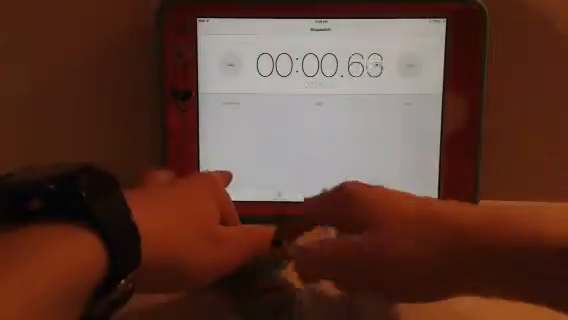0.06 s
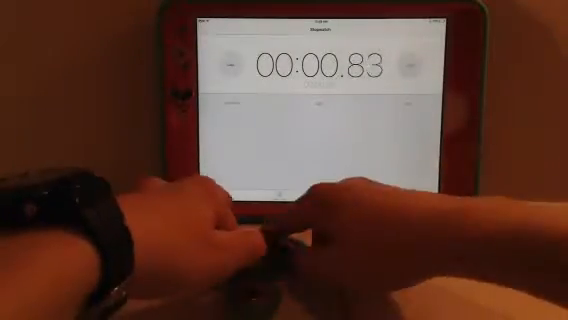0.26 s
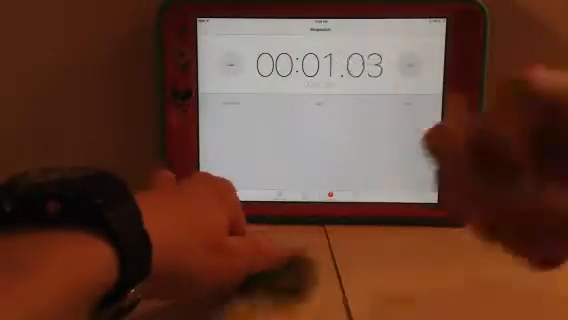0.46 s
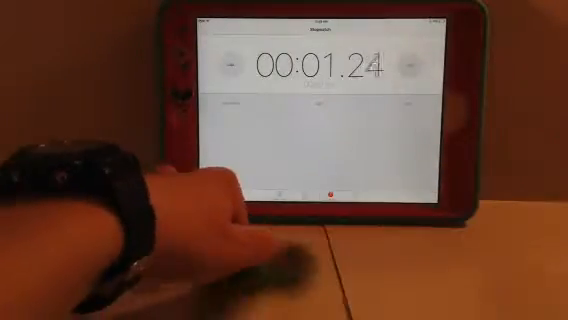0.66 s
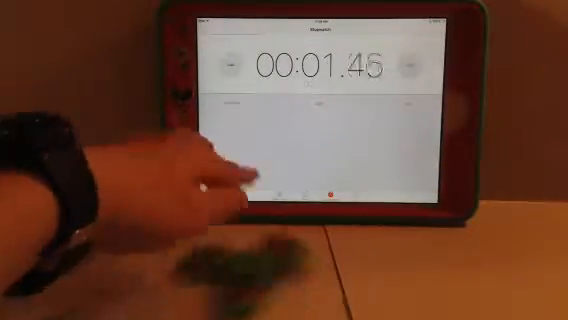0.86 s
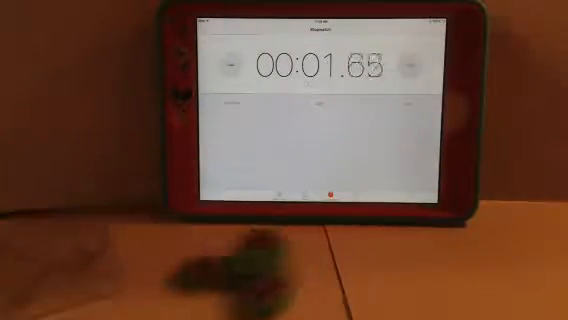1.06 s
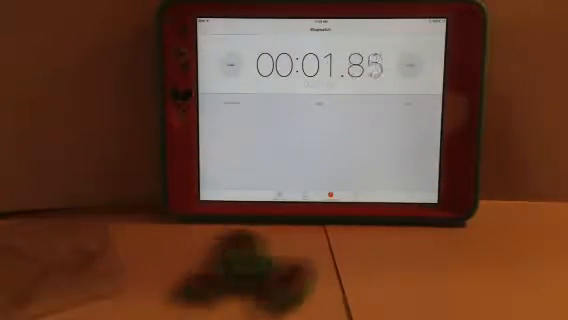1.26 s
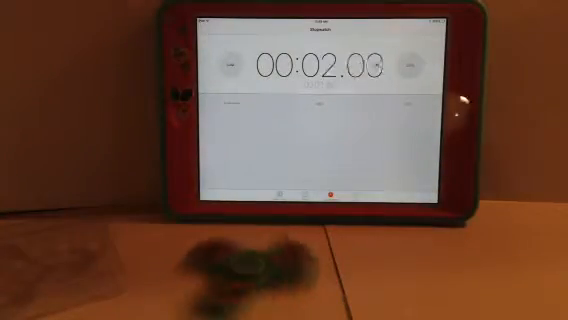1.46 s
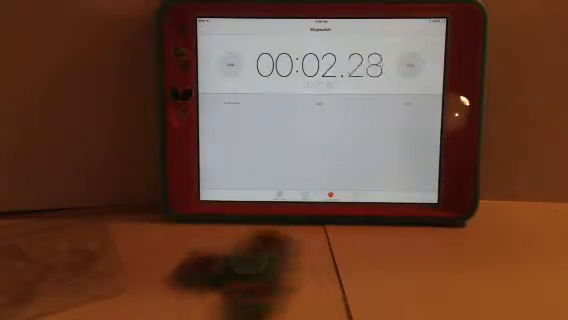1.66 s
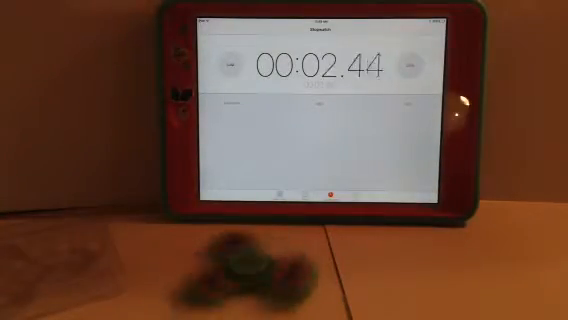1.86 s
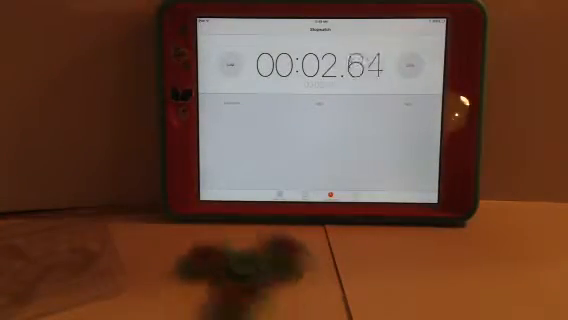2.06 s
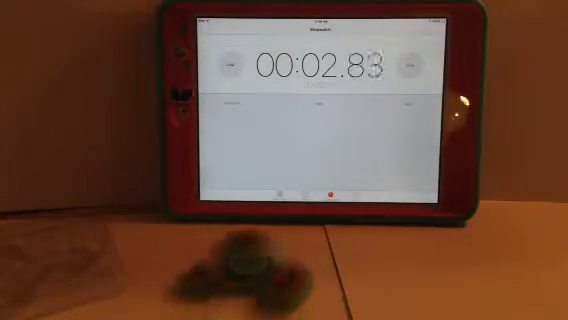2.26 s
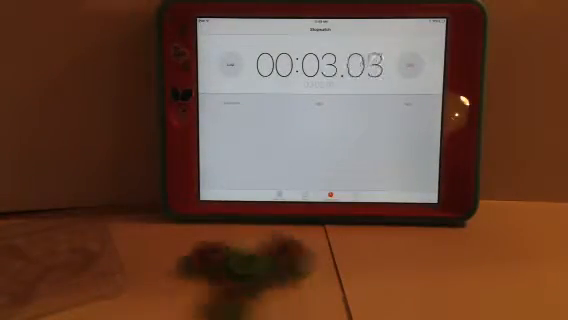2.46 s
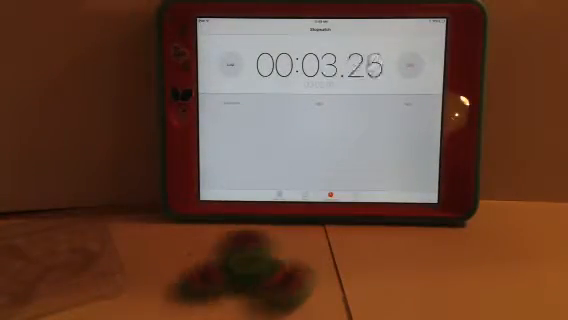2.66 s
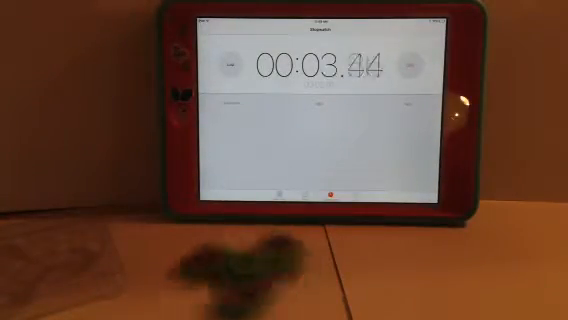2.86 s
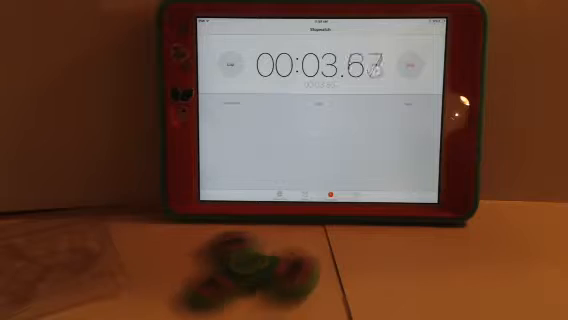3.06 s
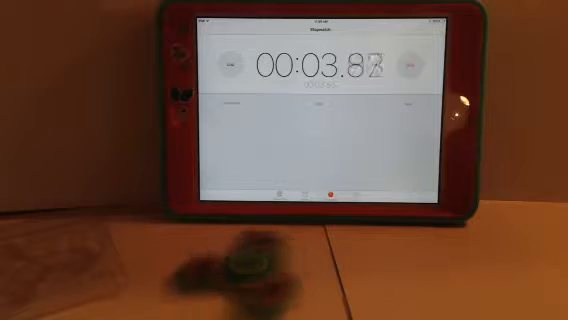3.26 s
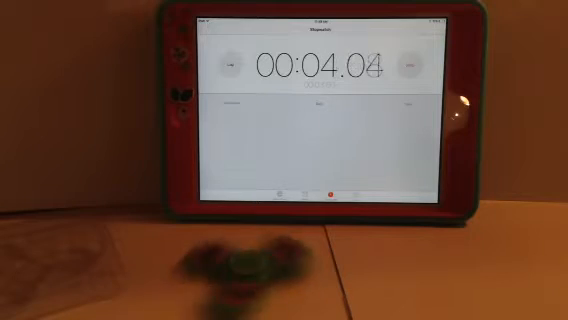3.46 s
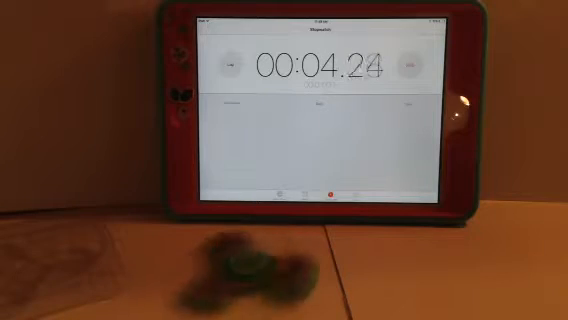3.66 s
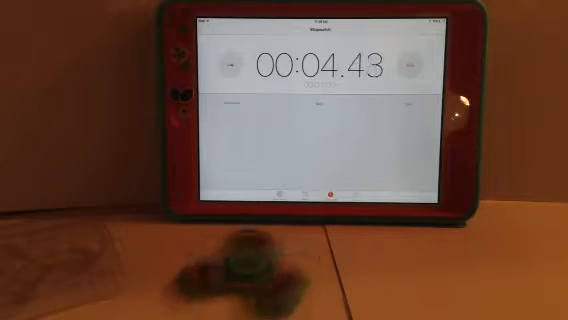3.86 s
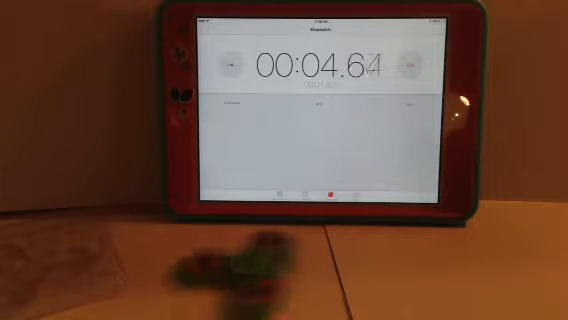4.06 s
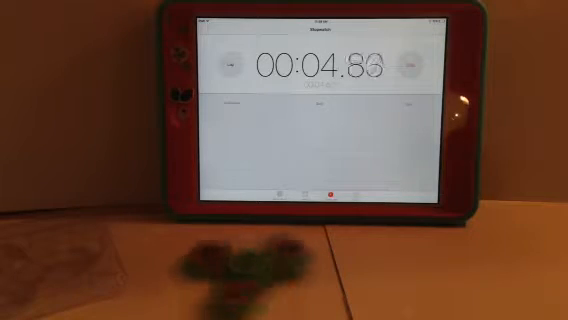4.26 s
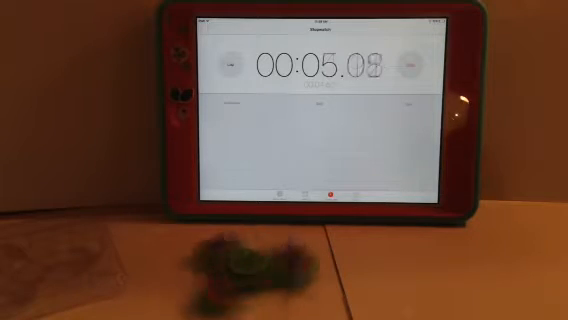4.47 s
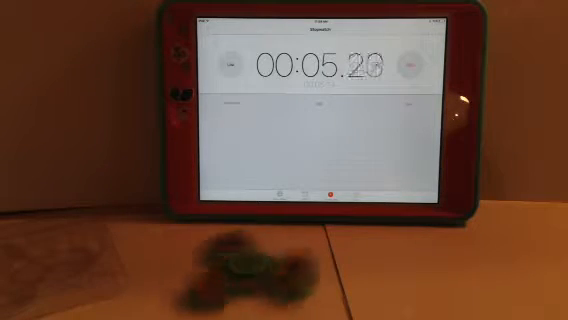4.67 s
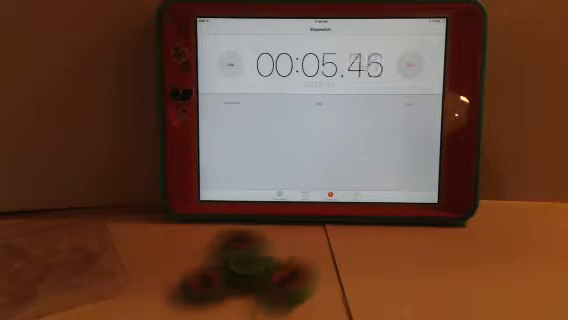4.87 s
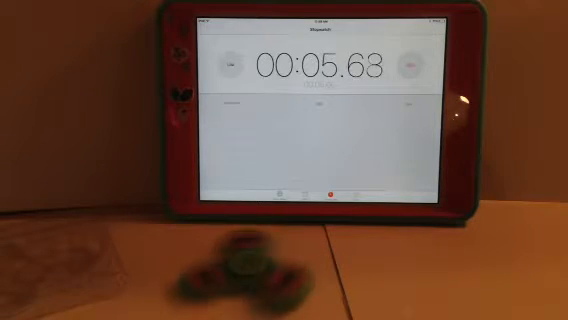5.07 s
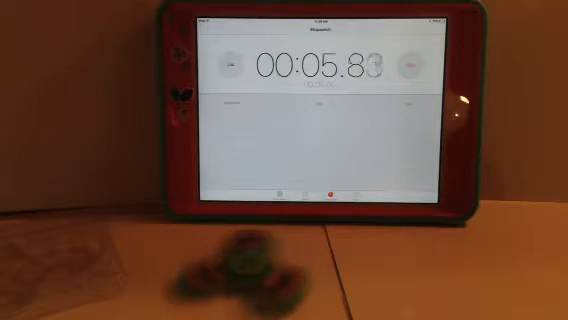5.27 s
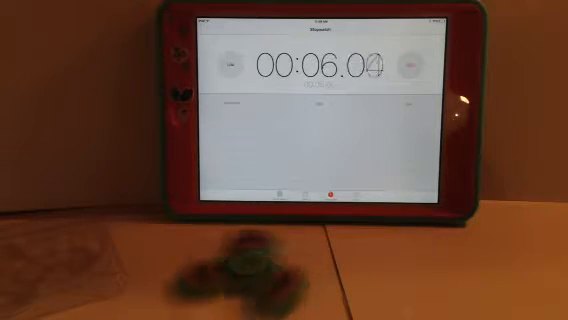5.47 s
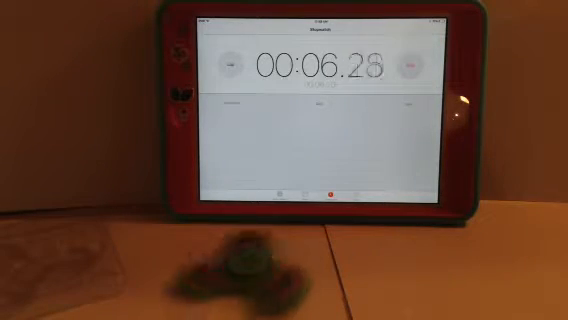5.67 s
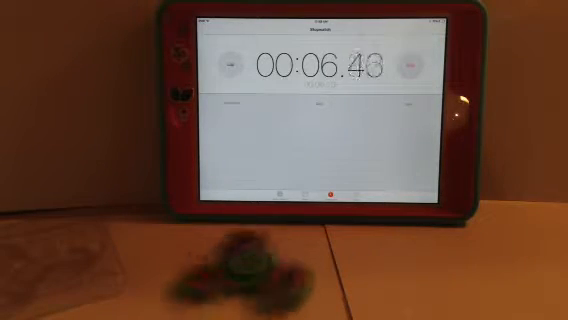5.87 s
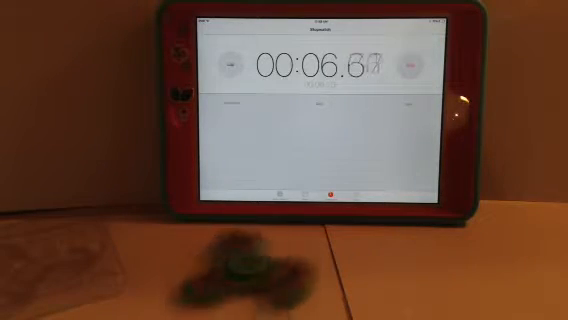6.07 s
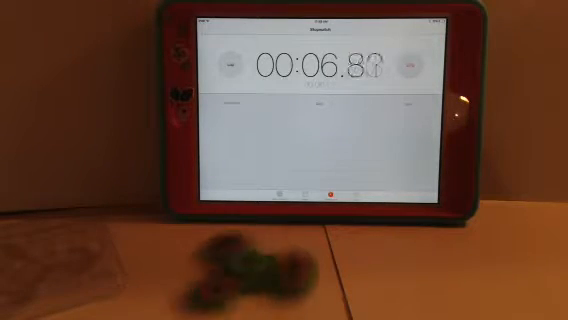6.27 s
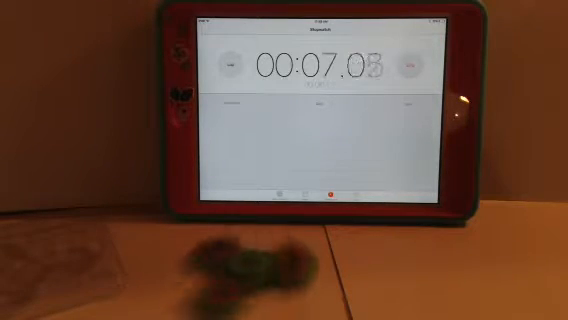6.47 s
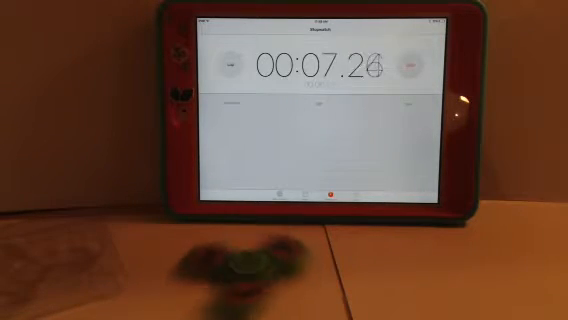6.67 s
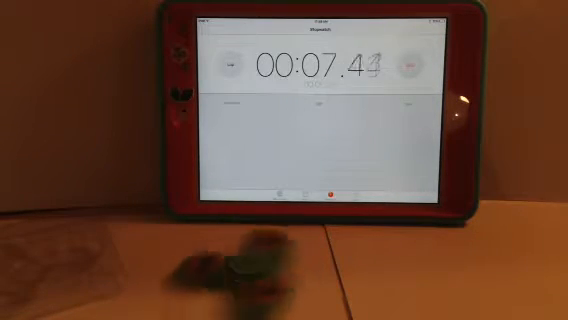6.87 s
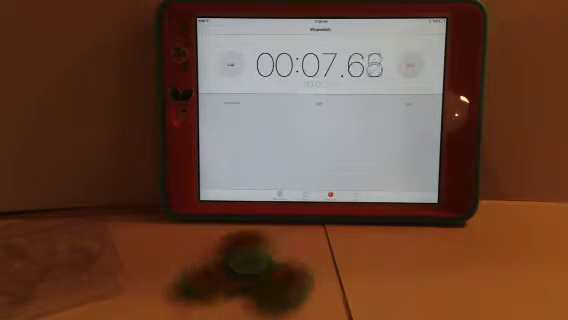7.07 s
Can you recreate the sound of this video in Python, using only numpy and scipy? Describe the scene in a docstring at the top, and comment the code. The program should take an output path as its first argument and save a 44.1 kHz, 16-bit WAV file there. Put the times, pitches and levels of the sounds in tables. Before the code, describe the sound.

Close up, a small spinning toy lands with a hard clack, knocks and wobbles on the table, then settles into a throbbing, gently sinking metallic whir.

```python
"""A three-armed fidget spinner is set down on a tabletop and flicked, close to a phone in a small room.
First a light tap and a thin ring; then the toy lands with a clack, modelled as noise bursts and a deep thud.
A finger scrapes off an arm and the bearing starts to whirr: rolling noise excites the modes of the body.
While a finger presses on the hub the table's ring is damped; then bouts of wobble drum on table and bearing.
Last comes a dry whirr that throbs three times a turn and slowly sinks, with sharp clicks of loose steel balls."""
import sys
import numpy as np
from scipy import signal
from scipy.fft import rfft, irfft
from scipy.io import wavfile
from scipy.ndimage import uniform_filter1d, map_coordinates

SR = 44100
rng = np.random.default_rng(int(sys.argv[2]) if len(sys.argv) > 2 else 0)


def pcm_store(signal):
    """Save signal as 16-bit PCM."""
    levels = np.round(np.clip(np.atleast_2d(signal), -1, 1) * 32767)
    wavfile.write(sys.argv[1], SR, levels.astype(np.int16).T)


N = 314433
TIME = np.arange(N) / SR

# All source levels are relative: filters, mixing gains and the room act on them later.
# slowing spin: (time [s], speed [turns/s])
SPIN = [(0, 11.9), (1, 11.45), (2.87, 10.76), (4.8, 10.285), (7.13, 9.725)]
# bouts of wobble: (start [s], knocks [count], knock rate [1/s], bearing rattle [dB], table drumming [dB],
# change of the body's rattle at the last knock [dB])
WOBBLES = [(0.86, 33, 115, -46.5, -48, 6), (1.221, 15, 45, -47, -56, -5), (1.551, 7, 55, -51, -56, 12.5),
           (1.787, 16, 55.6, -48.5, -52, 7), (2.122, 11, 40.6, -48, -65, 3),
           (2.391, 7, 44.3, -46.5, -61, 2)]
# resonant modes of the tabletop: (frequency [Hz], width [Hz], level [dB])
TABLE_MODES = [(183.4, 27, 2), (225.2, 16, 1.5), (293, 47, -6), (389, 30, 4), (457, 140, -6), (547, 39, -1),
               (613, 26, -2), (665, 49, -2.5), (865, 126, -9.5), (1005, 33, -1), (1145, 81, -10.5),
               (1343, 97, -8.5), (1466, 160, -12), (1930, 460, -17)]
# resonant modes of the spinner's body: (frequency [Hz], width [Hz], level [dB])
BODY_MODES = [(399, 55, -6), (1020, 35, -6.5), (1269, 214, -9), (1571, 200, -4), (1807, 106, 0),
              (2090, 610, -7.5), (2475, 64, 2.5), (2714, 84, 2), (2977, 70, 5.5), (3227, 180, -3.5),
              (3654, 163, -4), (4000, 160, -10), (4534, 99, -8)]
# resonant modes of the steel races: (frequency [Hz], width [Hz], level [dB])
STEEL_MODES = [(7150, 210, 4.5), (8140, 160, 15), (8360, 380, 7.5), (8840, 190, 18), (11200, 610, -8)]
# spectrum of the rolling hiss: (frequency [Hz], density [dB per Hz])
HISS_SPECTRUM = [(300, -17.5), (2500, -5.5), (4400, -2.5), (5300, -2), (6000, 3.5), (6900, 0), (7750, -3),
                 (8300, 6), (9200, 5), (10500, 1.5), (12000, -2.5), (13500, -10.5), (15000, -5.5)]
# spectrum of rattle, chatter and scrape: (frequency [Hz], density [dB per Hz])
CLACK_SPECTRUM = [(200, -9), (1500, 4.5), (3500, -9.5), (5000, 2), (7500, 3), (9500, 7.5), (11000, 5.5),
                  (12500, -5), (13800, -3), (15200, -2)]
# spectrum of the sharp clicks: (frequency [Hz], density [dB per Hz])
CRACK_SPECTRUM = [(200, -17), (800, -15), (1500, -10.5), (3500, -14), (5000, -3), (7500, -9.5), (9500, 0.5),
                  (11000, 7.5), (12500, 6), (13800, -0.5), (15200, -1)]
# spectrum of the bearing's throb: (frequency [Hz], density [dB per Hz])
THROB_SPECTRUM = [(200, 1.5), (700, -7.5), (1400, -3), (2000, -7), (2800, -3), (4500, -11), (9000, -0.5)]
# spectrum of the wobble's force on the table: (frequency [Hz], density [dB per Hz])
DRUMMING_SPECTRUM = [(140, -10), (225, -1.5), (400, -1.5), (600, 1.5), (750, -1), (1050, 3.5), (1450, 11),
                     (2500, -1), (8000, 4)]
# spectrum of a knock's force on the table: (frequency [Hz], density [dB per Hz])
KNOCK_SPECTRUM = [(110, -18.5), (180, 1.5), (240, 0), (420, 3.5), (620, 3), (1000, 6), (1400, 1.5),
                  (1750, 5), (2500, -7), (6000, -11.5)]
# spectrum of the landing: (frequency [Hz], density [dB per Hz])
SLAP_SPECTRUM = [(150, -0.5), (1000, -12), (2000, -10), (3000, -10), (4100, -23), (5100, -8), (6400, 4),
                 (7700, -3), (9500, 9), (11000, 3), (12500, 0), (15000, 1)]
# spectrum of the quiet room: (frequency [Hz], density [dB per Hz])
ROOM_TONE_SPECTRUM = [(25, 2), (60, -8), (98, -8), (122, 8.5), (160, 1.5), (270, 4.5), (420, 4.5),
                      (700, 0.5), (1500, -5), (5000, -7), (9000, -1), (15000, -2.5)]
# spectrum of the dry plastic tick: (frequency [Hz], density [dB per Hz])
TICK_SPECTRUM = [(1200, -12), (2500, 0), (5500, -1), (8500, -12)]
# rattles of plastic and loose steel balls: (start [s], contacts [count], gap [s], level [dB],
# change per contact [dB], share of the first contact that rings in the steel [0-1])
RATTLES = [(0.235, 2, 0.013, -45.5, -6, 0.35), (0.271, 2, 0.0083, -38, -5, 0.45),
           (0.302, 4, 0.008, -32, -4.5, 0.06), (.341, 1, .01, -52, 0, 0.8),
           (0.3735, 2, 0.013, -42.5, -2.5, 0.17), (0.468, 2, 0.018, -32, -2, 0.06),
           (1.2735, 2, 0.0032, -24, -6, 0.06), (1.29, 2, 0.0027, -26.5, -1, 0.04),
           (1.701, 2, 0.032, -32.5, -2.5, 0.2), (1.752, 1, .01, -35, 0, 0.4),
           (2.131, 3, 0.006, -38, -4.5, 0.22), (2.166, 3, 0.018, -43, -1, .9),
           (2.305, 2, 0.033, -45, -9, 0.4), (3.298, 5, 0.025, -45.5, 0, 0.67),
           (3.572, 2, 0.021, -46.5, 2.5, 0.8), (5.194, 2, 0.045, -48.5, 3.5, 0.6),
           (5.256, 3, 0.026, -42.5, -0.5, 0.75), (5.374, 2, 0.013, -45, -7, 0.1),
           (5.825, 2, 0.03, -46, 0.5, 0.64), (6.25, 1, .01, -49, 0, 0.8), (6.426, 2, 0.024, -49.5, -1, 0.3),
           (6.683, 2, 0.0014, -31.5, 1.5, 0.14), (6.6883, 2, 0.0089, -42, -1, 0.1),
           (6.712, 2, 0.0031, -38, 2, 0.25), (6.723, 1, .01, -35.5, 0, 0.8),
           (6.7457, 2, 0.027, -37, -8, 0.7)]
# soft contacts chatter longer than hard ones: (level [dB], decay [ms])
CONTACT_DECAY = [(-45, 8.0), (-35, 5), (-27, 2.6), (-18, 1.8)]
# knocks of the rocking hub on the table: (time [s], level [dB], contact length [ms])
THUMPS = [(.05, -60.5, 6.6), (0.281, -48.5, 6), (0.2869, -33, 10.7), (0.307, -38.5, 14), (0.33, -47, 13.4),
          (.455, -51, 14.5), (.471, -41, 17.7), (.493, -46, 6.8), (.508, -39, 11.6), (.523, -36.5, 6.9),
          (0.5642, -37.5, 9.9), (.587, -44.5, 11), (.607, -34.5, 6.8), (0.631, -47, 6.7),
          (0.65, -34.5, 7.9), (0.676, -44, 7.5), (0.695, -40.5, 6.6), (0.716, -42.5, 11), (0.732, -37, 7.5),
          (0.762, -41, 25), (0.797, -36.5, 7.8), (0.825, -41, 13), (1.353, -44.5, 11.2), (1.396, -44, 16.3),
          (1.526, -48.5, 13.2), (1.57, -59, 8.7), (2.2367, -41.5, 9.9), (2.26, -49.5, 12),
          (2.2826, -41, 10.4), (2.305, -56, 14), (2.3932, -42, 8), (2.4168, -43, 14), (2.438, -54, 9.2),
          (2.461, -46, 14.5), (2.528, -63, 9.4), (5.571, -54, 9.5), (6.683, -53, 4.7)]
# landing, rim first, then flat, then a bounce: (time [s], level [dB])
LANDING = [(.2895, -35), (.2913, -17.5), (.2946, -25)]
# mode of the light tap: (frequency [Hz], width [Hz], level [dB])
TAP_MODE = [(1770, 200, 0)]
# modes of the whole table under the toy's weight: (frequency [Hz], width [Hz], level [dB])
THUD_MODES = [(90, 22, -7), (122, 25, 0)]
# change of the table modes under the finger: (frequency [Hz], change [dB])
HELD_TILT = [(200, -12), (390, 3), (650, -2.5), (1000, 3.5), (1900, 4)]

# level of the body's ring and of the hiss once run in; both start higher and settle together
RING_DB, HISS_DB = -58.5, -55.5
FRESH_RING_DB, FRESH_HISS_DB, SETTLE_S = 8.5, 7, 3.36
# the finger on the hub muffles ring and hiss, and lets go from s to s
GRIP_RING_DB, GRIP_HISS_DB, LET_GO_S = -5, -5, (0.78, 0.95)
# the last rattle seats the balls better and the hiss drops
SEATED_S, SEATED_DB = 6.8, -1.5
# the throb sets in below this speed (turns per s) and deepens by this share for each turn per s lost
THROB_BELOW, THROB_GROWTH = 11.45, 0.42
THROB_AT_S = 4.8003  # an arm's cycle starts here
# the rolling ripples three times an arm and swells as the ball cage comes round
RIPPLE_DEPTH, CAGE_DEPTH, CAGE_SWELLS_PER_TURN = .14, .1, .7
# the body's resonances waver as the rotor turns: swing of the delay, and changes per s
WAVER_MS, WAVER_PER_S = 0.336, 24
RUMBLE_DB = -19  # share of the rolling that the hub passes into the tabletop
# in every bout the rattle builds up, then rattle and drumming sag
BUILD_DB, BUILD_S, SAG_DB_PER_S = -9.5, 0.074, 9.5
# unevenness of the knocks, and level of the grit in the drumming
KNOCK_SCATTER_DB, DRUM_GRIT_DB = 1.2, -5
# a thump opens with a clean push; its chatter decays with this constant once the contact ends
PUSH_DB, RELEASE_MS = -5.5, 3.0
# the hub rebounds once, this far into the contact and this much softer
REBOUND_SHARE, REBOUND_DB = 0.549, -9
# a finger presses on the hub from s to s, and widens each mode of the table
HELD_S, HELD_WIDTH_HZ = (.555, .86), 40
STEEL_PER_CONTACT = 0.036  # each further contact rings more in the steel
# the finger slides off an arm: full pressure from s to s, level, and slopes before and after
FLICK_S, FLICK_DB = (0.46, 0.522), -47.5
FLICK_RISE_DB_PER_S, FLICK_FALL_DB_PER_S = 319, 270.0
THUD_DB, ROOM_TONE_DB, HUM_DB = -53.5, -61.5, -78
TAP, TICK = (0.0048, -55), (5.692, -45.5)  # (time [s], level [dB])
THIN_TONE_HZ, THIN_TONE_DB = 3770, -81
TOP_HZ = 15400


def bearing():
    """Rolling contact: balls on rough races hiss and ring the body, pressing harder as each arm comes round."""
    speed = speed_at(TIME)
    arms = 3 * np.cumsum(speed) / SR
    arms -= arms[int(THROB_AT_S * SR)]
    gripped = np.interp(TIME, LET_GO_S, [1, 0])
    fresh = np.exp(-np.maximum(TIME - LET_GO_S[1], 0) / SETTLE_S)
    ring_db = RING_DB + FRESH_RING_DB * fresh + GRIP_RING_DB * gripped
    hiss_db = HISS_DB + FRESH_HISS_DB * fresh + GRIP_HISS_DB * gripped + SEATED_DB * (TIME > SEATED_S)

    # a main swell for each arm and two weaker ones between; they stand out as the spin slows
    swells = [(.02, 1), (.36, .1), (.68, .18)]  # (lag in cycles, size)
    throb = sum(size * beat(arms - lag, rise=.08, fall=.07) ** 2 for lag, size in swells)
    depth = np.clip(THROB_GROWTH * (THROB_BELOW - speed), 0, 1)
    hiss_depth = np.clip(0.25 * depth, 0, 1)

    strength = undb(ring_db + 0.08 * walk(21))
    arm_ripple = RIPPLE_DEPTH * np.cos(2 * np.pi * 3 * (arms - .1))
    cage_swell = CAGE_DEPTH * np.cos(2 * np.pi * CAGE_SWELLS_PER_TURN * arms / 3)
    roughness = grit(spread_db=5.0) * undb(1.25 * walk(180))
    rolling = strength * np.sqrt(1 - depth) * (1 + arm_ripple + cage_swell) * roughness

    # each swell carries a clean double tick as the play is taken up
    double_tick = sum(taps(arms + lead + .012 * walk(30), width=.002) for lead in (.1, .03))
    double_tick = double_tick * undb(.8 * walk(30))
    contact = undb(-6.5) * np.sqrt(throb) * grit(spread_db=2) + undb(-10.5) * double_tick
    pressing = colour(strength * np.sqrt(depth) * contact, THROB_SPECTRUM)
    hiss = np.sqrt(1 - hiss_depth + hiss_depth * throb) * grit(spread_db=2.0) * undb(1.27 * walk(110))

    # gripped by the hand the body is stiffer and rings higher
    stiff_modes = [(1.13 * hz, 2.6 * width, db) for hz, width, db in BODY_MODES]
    free_ring = np.sqrt(1 - gripped) * ring(rolling + pressing, BODY_MODES)
    whirr = free_ring + np.sqrt(gripped) * ring(rolling, stiff_modes)
    # a wandering delay shifts the pitch of the resonances slightly
    read_at = (TIME + WAVER_MS / 1000 * walk(WAVER_PER_S)) * SR
    whirr = map_coordinates(whirr, [read_at], mode="nearest")
    spinning = np.clip((TIME - .46) / 0.034, 0, 1)
    rumble = undb(RUMBLE_DB) * ring(rolling + pressing, TABLE_MODES)
    return spinning * (whirr + rumble + colour(hiss * undb(hiss_db), HISS_SPECTRUM))


def wobble():
    """Periodic impact: the tilted rotor knocks in its play, rattling the balls and drumming on the table."""
    balls, body, drumming = 0, 0, 0
    rough = grit(spread_db=1.0)
    for start, count, rate, rattle_db, drum_db, last_db in WOBBLES:
        age = np.maximum(TIME - start, 0)
        cycles = age * rate
        bout = (age > 0) * (cycles < round(count)) * undb(-SAG_DB_PER_S * age)
        knocks = beat(cycles, rise=.2, fall=.18)
        rattle = bout * knocks * undb(rattle_db + BUILD_DB * np.exp(-age / BUILD_S))
        balls = balls + rattle
        body = body + rattle * np.where(cycles > round(count) - 1, undb(last_db), 1)
        # the even pushes make the table hum on multiples of the knock rate
        pushes = undb(-12) * taps(cycles, width=rate / 10000)
        gritty = undb(DRUM_GRIT_DB) * np.sqrt(knocks) * rough
        drumming = drumming + bout * undb(drum_db) * (pushes + gritty)
    chatter = undb(KNOCK_SCATTER_DB * walk(50)) * grit(spread_db=2)
    force = colour(drumming * undb(0.73 * walk(52.5)), DRUMMING_SPECTRUM)
    in_bearing = undb(-2.0) * colour(balls * chatter, CLACK_SPECTRUM)
    return in_bearing + undb(-7.5) * ring(body * rough, BODY_MODES) + ring(force, TABLE_MODES)


def thumps():
    """Forced vibration: each knock of the hub drives the table by push, rebound and chatter; the body answers."""
    power, push = np.zeros(N), np.zeros(N)
    ms = TIME[:SR // 10] * 1000
    for at, db, length_ms in THUMPS:
        first = int(at * SR)
        release = np.exp(-np.maximum(ms - length_ms, 0) / RELEASE_MS)
        contact = (undb(db) * np.minimum(ms, 1) * release) ** 2
        power[first:first + len(ms)] += contact
        impulse = np.sqrt(contact.sum())
        push[first + int(.0015 * SR)] = impulse
        push[first + int(REBOUND_SHARE * length_ms / 1000 * SR)] += undb(REBOUND_DB) * impulse
    chatter = np.sqrt(power) * grit(spread_db=1.0)
    soft_push = signal.sosfilt(signal.butter(2, 1400, fs=SR, output="sos"), push)
    rubbing = undb(-53.5) * held() * grit(spread_db=0.5)
    mixed = undb(PUSH_DB) * soft_push + undb(-4.5) * chatter + rubbing
    force = undb(-7.0) * colour(mixed, KNOCK_SPECTRUM)
    free = ring(force, TABLE_MODES, sign=1)
    # while a finger presses on the hub it damps the lowest modes and the long ring
    tilt = np.transpose(HELD_TILT)
    pressed_modes = [(hz, width + HELD_WIDTH_HZ, db + np.interp(hz, *tilt)) for hz, width, db in TABLE_MODES]
    damped = ring(force, pressed_modes, sign=1)
    damped = undb(-1.5) * signal.sosfilt(signal.butter(2, 330, "high", fs=SR, output="sos"), damped)
    table = (1 - held()) * free + held() * damped
    return table + undb(-14.0) * ring(chatter, BODY_MODES) + undb(-11.0) * colour(chatter, CLACK_SPECTRUM)


def landing():
    """Impact: the plastic slaps the tabletop and its weight sets off a deep thud; returns slap and thud."""
    power = sum(blow(at, db, contact_decay_ms(db), rise_ms=.3) for at, db in LANDING)
    weight = np.zeros(N)
    weight[int(LANDING[0][0] * SR)] = undb(THUD_DB) * np.sqrt(SR / 100)
    return colour(np.sqrt(power) * grit(spread_db=1.0), SLAP_SPECTRUM), ring(weight, THUD_MODES)


def clicks():
    """Energy sharing in hard contacts: each is a bright crack, with part of its energy ringing in the steel."""
    crack, steel = 0, 0
    for start, count, gap, first_db, step_db, first_share in RATTLES:
        for k in range(round(count)):
            db = first_db + k * step_db
            share = np.clip(first_share + k * STEEL_PER_CONTACT, 0, 1)
            power = blow(start + k * gap, db, contact_decay_ms(db), rise_ms=0.3)
            crack = crack + (1 - share) * power
            steel = steel + share * power
    bright = colour(np.sqrt(crack) * grit(spread_db=2), CRACK_SPECTRUM)
    return bright + ring(np.sqrt(steel) * rng.standard_normal(N), STEEL_MODES)


def flick():
    """Sliding friction: the fingertip scrapes off the arm as it throws it round, and the body rings a little."""
    early = np.maximum(FLICK_S[0] - TIME, 0)
    late = np.maximum(TIME - FLICK_S[1], 0)
    pressure = undb(FLICK_DB - FLICK_RISE_DB_PER_S * early - FLICK_FALL_DB_PER_S * late)
    scrape = pressure * grit(spread_db=1.5)
    return colour(scrape, CLACK_SPECTRUM) + undb(-19.0) * ring(scrape, BODY_MODES)


def tap():
    """Modal response: a light tap excites a single damped mode before the toy is set down."""
    return ring(np.sqrt(blow(*TAP, decay_ms=4.7, rise_ms=1.5)) * grit(spread_db=3.5), TAP_MODE)


def plastic_tick():
    """Transient noise: late in the spin the body gives one dry tick, a coloured burst without ring."""
    return colour(np.sqrt(blow(*TICK, decay_ms=4.5, rise_ms=1)) * grit(spread_db=1.5), TICK_SPECTRUM)


def hum():
    """Rotational harmonic: for a few seconds after the wobble a low hum at 18 cycles a turn sinks with the spin."""
    phase = 2 * np.pi * 18 * np.cumsum(speed_at(TIME)) / SR
    swell = np.interp(TIME, [2.4, 2.7, 4.4, 5.2], [0, 1, 1, 0])
    return swell * undb(HUM_DB + 2 * walk(5.6)) * np.sqrt(2) * np.sin(phase)


def thin_tone():
    """Pure tone: a faint, thin sinusoid hangs in the quiet before the clack."""
    swell = np.interp(TIME, [.03, .12, .24, .29], [0, 1, 1, 0])
    return swell * undb(THIN_TONE_DB) * np.sqrt(2) * np.sin(2 * np.pi * THIN_TONE_HZ * TIME)


def room(x, t60, wet_db, bass_t60, bass_db):
    """Reverberation: close walls give a short, dense, decaying tail; the bass lingers a little longer."""
    t = TIME[:SR // 2]
    tail, boom = (rng.standard_normal(len(t)) * np.exp(-np.log(1000) * t / s) * (t > .003)
                  for s in (t60, bass_t60))
    bass = signal.sosfilt(signal.butter(2, 300, fs=SR, output="sos"), x)
    return x + undb(wet_db) * through(x, tail) + undb(bass_db) * through(bass, boom)


def room_tone():
    """Ambient noise: a random signal of fixed spectrum whose level drifts slightly."""
    return colour(rng.standard_normal(N) * undb(ROOM_TONE_DB + .5 * walk(4.74)), ROOM_TONE_SPECTRUM)


def speed_at(t):
    """Kinematics: turns per second at a given time, interpolated as the spin slows."""
    return np.interp(t, *np.transpose(SPIN))


def held():
    """Damping control: 1 while a finger presses on the hub, else 0, with 10 ms ramps."""
    return uniform_filter1d(1. * (TIME > HELD_S[0]) * (TIME < HELD_S[1]), size=441)


def contact_decay_ms(db):
    """Contact stiffness: the harder the blow, the shorter its chatter."""
    return np.interp(db, *np.transpose(CONTACT_DECAY))


def blow(at, db, decay_ms, rise_ms):
    """Impact envelope: power over time of one contact that chatters and dies away."""
    power, first = np.zeros(N), int(at * SR)
    ms = TIME[:len(power[first:first + SR // 8])] * 1000
    shape = (1 - np.exp(-ms / rise_ms)) * np.exp(-ms / decay_ms)
    power[first:first + len(ms)] = (undb(db) * shape / shape.max()) ** 2
    return power


def beat(cycles, rise, fall):
    """Amplitude modulation: a swell once a cycle, quick to rise and slower to fall; rms 1."""
    phase = cycles % 1
    swell = (1 - np.exp(-phase / rise)) * np.exp(-phase / fall)
    return swell / np.sqrt(np.mean(swell ** 2))


def taps(cycles, width):
    """Periodic excitation: one short, clean push a cycle; rms 1."""
    push = np.exp(-((cycles % 1 - .15) / width) ** 2)
    return (push - push.mean()) / push.std()


def grit(spread_db):
    """Surface roughness: dense tiny impacts of uneven size; rms 1."""
    uneven = np.repeat(rng.standard_normal(N // 8 + 1), 8)[:N]
    x = rng.standard_normal(N) * undb(spread_db * uneven)
    return x / x.std()


def walk(rate):
    """Random fluctuation: levels held 1 / rate s and slewed twice; spread near 1."""
    k = int(SR / rate)
    steps = np.repeat(rng.standard_normal(N // k + 1), k)
    return np.sqrt(2) * uniform_filter1d(uniform_filter1d(steps, k), k)[:N]


def ring(x, modes, sign=-1):
    """Modal superposition: damped modes of alternating sign, or all in step (sign 1) for a sharp attack."""
    t = TIME[:SR // 5]
    response = 0
    for k, (hz, width, db) in enumerate(modes):
        decay = np.exp(-np.pi * width * t)
        response = response + sign ** k * undb(db) * width * decay * np.sin(2 * np.pi * hz * t)
    return through(x, response)


def colour(x, points, size=4096):
    """Minimum-phase filtering: the cepstrum gives a causal filter with the given spectrum."""
    hz, db = np.transpose(points)
    bins = np.arange(size // 2 + 1) * SR / size
    gain = undb(np.interp(np.log(bins + 1), np.log(hz), db))
    cepstrum = irfft(np.log(gain))
    # folding the cepstrum onto positive times makes the response causal
    cepstrum[1:size // 2] *= 2
    return through(x, irfft(np.exp(rfft(cepstrum[:size // 2], size))))


def through(x, response):
    """Linear convolution: pass a sound through a response scaled to unit energy."""
    return signal.fftconvolve(x, response / np.sqrt(np.sum(response ** 2)))[:N]


def undb(db):
    """Logarithmic level: decibels to amplitude gain."""
    return 10 ** (np.asarray(db) / 20)


def scene():
    """Superposition: spinner and table in the room, over a quiet room tone."""
    slap, thud = landing()
    dry_toy = slap + bearing() + wobble() + thumps() + clicks() + flick() + tap() + plastic_tick()
    toy = room(dry_toy, t60=0.13, wet_db=-9.0, bass_t60=0.45, bass_db=-7.0)
    # so small a toy radiates hardly any bass
    toy = signal.sosfilt(signal.butter(6, 145, "high", fs=SR, output="sos"), toy)
    return (undb(-1.5) * toy + thud + hum() + thin_tone() + room_tone())[None]


def record(dry):
    """Band limiting: the phone thins the deep bass and cuts the top."""
    thin = signal.sosfilt(signal.butter(2, 90, "high", fs=SR, output="sos"), dry)
    return signal.sosfilt(signal.ellip(10, .2, 70, TOP_HZ, fs=SR, output="sos"), thin)


dry = scene()
out = record(dry)
pcm_store(out)
```